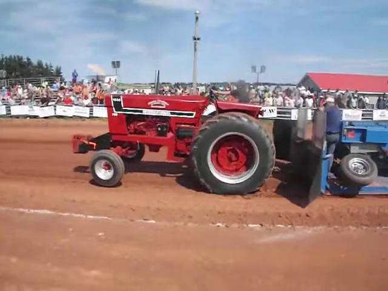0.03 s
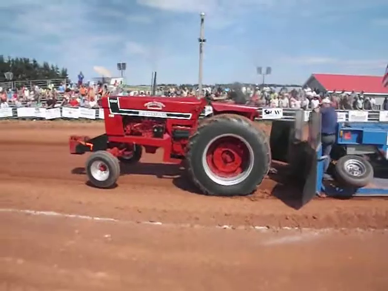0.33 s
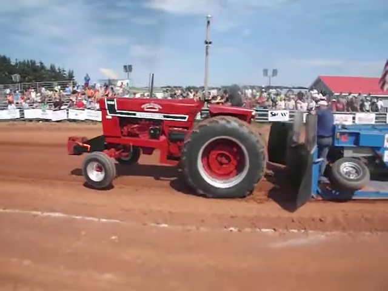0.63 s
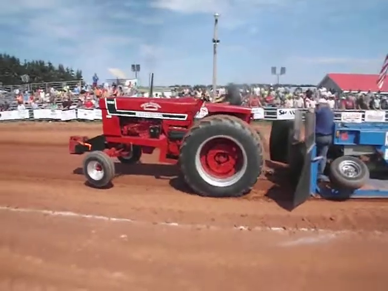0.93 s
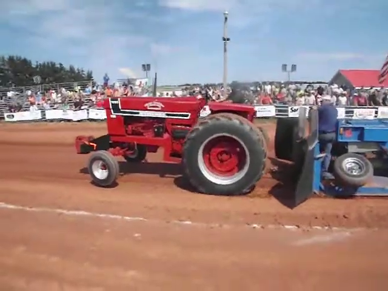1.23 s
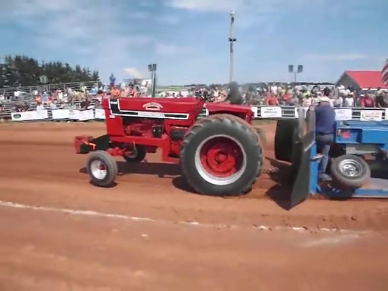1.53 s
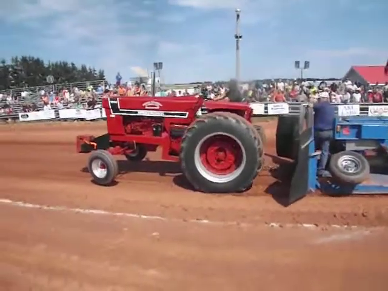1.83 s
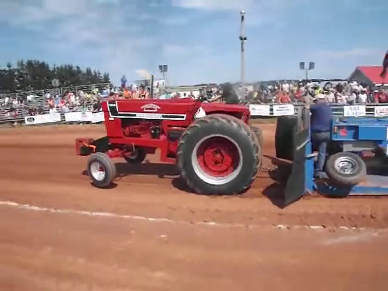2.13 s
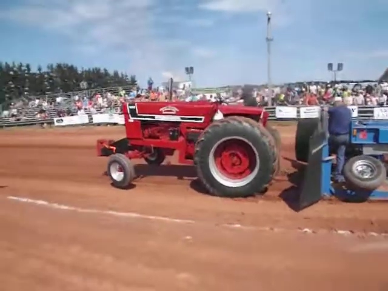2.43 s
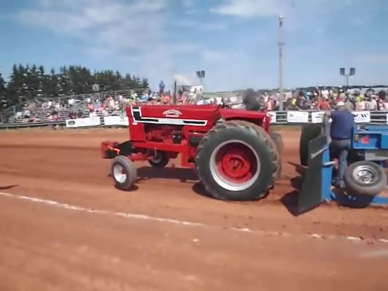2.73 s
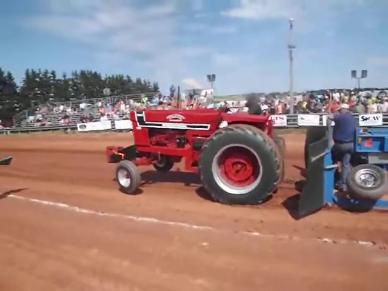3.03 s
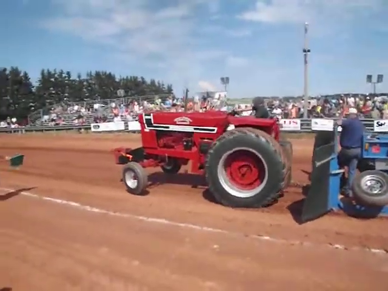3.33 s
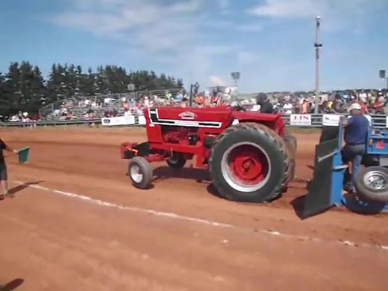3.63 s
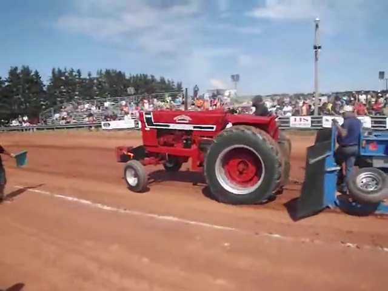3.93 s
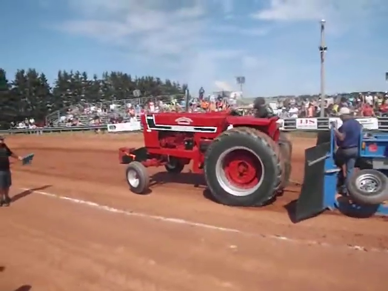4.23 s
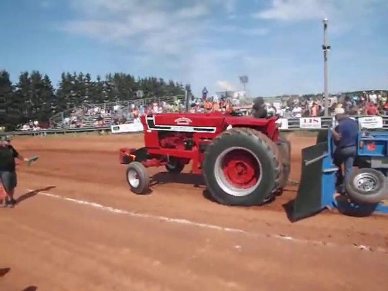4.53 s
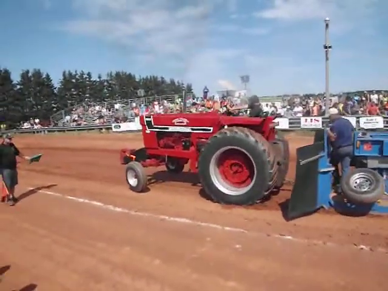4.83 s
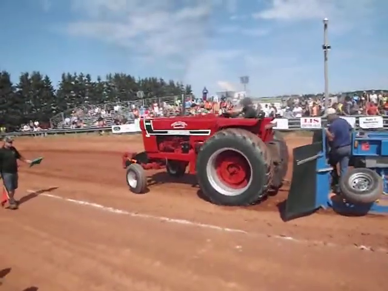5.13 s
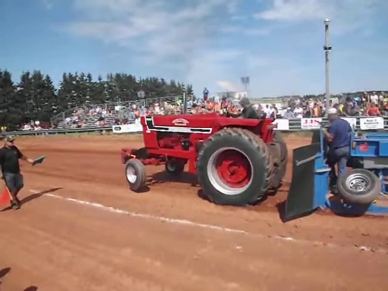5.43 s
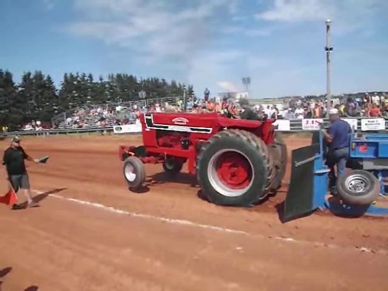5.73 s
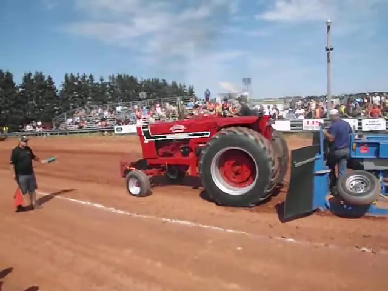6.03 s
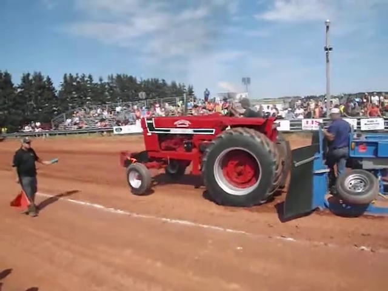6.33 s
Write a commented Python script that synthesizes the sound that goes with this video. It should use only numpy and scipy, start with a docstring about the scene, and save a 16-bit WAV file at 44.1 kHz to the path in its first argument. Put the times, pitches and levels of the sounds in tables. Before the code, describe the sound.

A diesel pulling tractor roars close by with a harsh metallic bark, lugs down under load, then revs up sharply.

```python
"""A six-cylinder diesel pulling tractor drags a sled down a dirt track, a few metres away.
It starts at a steady speed: each firing gives a harsh metallic bark and an exhaust thump, some crack
much harder, and the sled's engine drones underneath. A gear whine swells as the tractor passes.
At about 4.4 s the engine lugs down and the whine dies. From 5.6 s the load comes off and the engine
revs up; the bark dulls for a moment and a growl sings out of the exhaust pipe."""
import sys
import numpy as np
from scipy import signal
from scipy.fft import rfft, irfft
from scipy.io import wavfile
from scipy.ndimage import uniform_filter1d, minimum_filter1d

SR = 44100
rng = np.random.default_rng(int(sys.argv[2]) if len(sys.argv) > 2 else 0)


def unload_wav(signal):
    """Save mono or channel-first audio to the path in sys.argv[1] as 16-bit WAV at rate SR, clipped to [-1, 1]."""
    wavfile.write(
        sys.argv[1],
        SR,
        np.round(np.clip(np.atleast_2d(signal).T, -1, 1) * 32767).astype(np.int16),
    )


N = 290178
TIME = np.arange(N) / SR

# The sled engine's drone. Each row: pitch in Hz, level in dB.
SLED_PARTIALS = [(32.1, -38), (64, -42.5)]
# EQ of the track's rumble. Each row: frequency in Hz, gain in dB.
RUMBLE_EQ = [(10, -8), (25, -13), (42, 9.5), (60, -14), (120, -0.5), (200, -17.5), (500, -46)]
# Engine speed. Each row: time in seconds, firing rate in Hz.
FIRING_RATE = [(0.0, 92.42), (0.8, 92.96), (1.25, 92.2), (2.2, 91.43), (2.5, 91.94), (4.28, 91.69),
               (4.62, 85.48), (5.25, 83.16), (5.6, 85.15), (5.82, 114.62), (6.05, 137.37), (6.58, 174.02)]
# Engine load, which keeps the bark bright. Each row: time in seconds, load from 0 to 1.
ENGINE_LOAD = [(0, 0.75), (5.6, 0.89), (5.95, 0), (6.12, 0), (6.35, 0.4), (6.58, 1)]
# The cylinders in firing order. Each entry: relative strength in dB.
CYLINDER_DB = [0, 2.5, -2.5, -1, -2.5, 1.5]
# Brief loud swells, after which the level ducks and recovers. Each row: end in seconds,
# length in seconds, bark change in dB, roar change in dB, depth of the dip in dB.
LEVEL_SWELLS_AND_DIPS = [(0.531, 0.12, 2.5, 2.5, 3.5), (0.684, 0.081, 3, 3.5, 0.5),
                         (0.896, 0.037, 3.5, 1, 2), (1.85, 0.099, 1, 2, -1), (2.292, 0.06, 1, 0, 5.5),
                         (2.664, 0.19, 2, 1.5, 3.5), (3.502, 0.054, 2.5, 3.5, 3.0),
                         (3.706, 0.054, 1.5, 2.0, 1.5), (3.892, 0.088, 3, 2, 0.5), (4.467, 0.057, 1, 2, 1),
                         (4.83, 0.12, 1.0, 2, 4), (4.923, 0.047, 5.5, 6.5, 1.5),
                         (5.535, 0.084, 1, 4.5, 0.5), (5.745, 0.033, 4.5, 3, 2), (6.08, 0.044, 5, -8.5, 8)]
# The deep exhaust note. Each row: time in seconds, fundamental level in dB, octave level in dB.
EXHAUST_NOTE = [(0, -35, -29), (1.2, -32.5, -30), (2.8, -29.5, -36), (4.1, -30.5, -42.5), (4.5, -30.5, -34),
                (5.4, -26.5, -35), (6.0, -34, -30.5), (6.2, -27, -50)]
# Growl of unequal cylinders. Each entry: relative dB of one cycle-rate harmonic, from the 7th up.
GROWL_HARMONICS_DB = [-3.5, 6, 10, 6, 1, -14.5, 4, 4, 5, -4.5, 0.5, 6, -16, 0.5, 6, -7, 2, 0, -10, 0.5, 3.5,
                      -7.5, -5.5, -9, -5, 3, -11.5, -2.5]
# Resonances of the exhaust pipe. Each row: frequency in Hz, gain in dB.
PIPE_EQ = [(90, -21), (138, -20.5), (160, -5), (212, -6.5), (250, 0.5), (300, -9.5), (340, -3.5), (392, -1),
           (425, -9.5), (465, -15.5), (520, 0), (600, 3.5), (710, -3.5), (810, 2.5), (890, -11),
           (1020, -3.5), (1220, -24), (1390, -1.5), (1500, -11.5), (2500, -42)]
# Ping of the exhaust stack. Each row: pitch in Hz, decay time in seconds, relative level in dB.
STACK_MODES = [(2814, 0.0032, -5.5), (3073, 0.0029, 1.5), (3235, 0.0016, 5.5)]
# Rasp of the gas in stack and block. Each row: frequency in Hz, gain in dB.
RASP_EQ = [(500, -20.5), (900, -14), (1500, -11.5), (1870, -9.5), (2220, -5.5), (2430, -8), (2750, 1),
           (3350, 1), (3650, -9), (4020, -7), (4250, -8.5), (5100, -14.5), (5500, -31), (5900, -37.5)]
# Single hard firings. Each row: start in seconds, relative strength in dB.
HARD_HITS = [(0.0593, -7), (0.4279, -3), (0.7068, -5), (0.8495, -3), (1.0316, -5), (1.291, -4),
             (1.5189, -4), (1.8153, -5), (2.3376, -5), (2.4463, -6), (2.5336, -3), (2.5985, -3),
             (2.6648, -3), (2.9248, -5), (3.2535, -3), (3.4714, -5), (3.5359, -5), (3.8861, -2),
             (4.1679, -6), (4.4323, -3), (4.6394, -4), (4.8509, -8), (5.2076, -5), (5.2794, -3),
             (5.4944, -3)]


def undb(db):
    """Decibels to gain."""
    return 10 ** (np.asarray(db) / 20)


def unit(x):
    """Scale to rms 1."""
    return x / np.sqrt(np.mean(x ** 2))


def steady(x):
    """Ride the level to rms 1 over about two engine cycles, keeping single firings distinct."""
    return x / np.sqrt(uniform_filter1d(x ** 2, size=5700) + 1e-12)


def curves(table):
    """One automation curve per value column of (seconds, value, ..) rows."""
    times, *columns = np.transpose(table)
    return [np.interp(TIME, times, column) for column in columns]


def wander(rate_hz):
    """Smooth random drift with rms 1."""
    span = int(SR / rate_hz)
    drift = uniform_filter1d(rng.standard_normal(N), span, mode="wrap")
    return unit(uniform_filter1d(drift, span, mode="wrap"))


def equalize(x, eq):
    """Minimum-phase EQ through (Hz, dB) points."""
    hz, db = np.transpose(eq)
    size = 2 ** 13
    bin_hz = np.arange(size // 2 + 1) * SR / size
    gain = undb(np.interp(np.log(bin_hz + 1), np.log(hz), db))
    cepstrum = irfft(np.log(gain))[:size // 2]
    cepstrum[1:] *= 2
    impulse = irfft(np.exp(rfft(cepstrum, size)))
    return signal.fftconvolve(x, impulse)[:N]


def noise(eq, envelope=1):
    """White noise shaped by an envelope, then an EQ."""
    return equalize(rng.standard_normal(N) * envelope, eq)


def muffle(x, edge_hz):
    """Roll off the treble above the edge."""
    return signal.sosfiltfilt(signal.butter(3, edge_hz, fs=SR, output="sos"), x)


def band(x, hz, width_hz):
    """Isolate one resonant band."""
    return signal.lfilter(*signal.iirpeak(hz, hz / width_hz, fs=SR), x)


def bursts(impulses, rise_s, fall_s):
    """Give each impulse an attack and a decay."""
    t = np.arange(SR // 20) / SR
    shape = (1 - np.exp(-t / rise_s)) * np.exp(-t / fall_s)
    return np.abs(signal.fftconvolve(impulses, shape / shape.max())[:N])


def level_rides():
    """Fluttering fader moves in dB for bark and roar: the level swells, holds, dips and recovers."""
    rise_s, drop_s, recovery_db_per_s = 0.022, 0.049, 31.5
    rides = np.zeros((2, N))
    for end, length, bark_db, roar_db, dip_db in LEVEL_SWELLS_AND_DIPS:
        start, bottom = end - length, end + drop_s / 2
        recovered = bottom + abs(dip_db) / recovery_db_per_s
        times = np.sort([start - rise_s, start, end - drop_s / 2, bottom, recovered])
        rides += [np.interp(TIME, times, [0, db, db, -dip_db, 0]) for db in (bark_db, roar_db)]
    return rides + wander(9.8)


def sled():
    """The bed: the sled engine's low drone over the rumble of its pan dragged through the dirt."""
    drone = 0
    for hz, db in SLED_PARTIALS:
        level = np.sqrt(2) * undb(db + 1.8 * wander(5.8))
        drone += level * np.sin(2 * np.pi * hz * TIME + 0.27 * wander(4))
    return drone + undb(-39) * unit(noise(RUMBLE_EQ))


def gear_whine(firing_count):
    """Teeth mesh on the crank: loudest as the tractor passes, dying once the engine lugs."""
    teeth, pass_s, lug_s = 22, 2.74, 4.44
    mesh_db = -30.5 - 2.33 * np.abs(TIME - pass_s) - 110.5 * np.maximum(TIME - lug_s, 0)
    octave_db = mesh_db - 9.5 + 7.5 * np.exp(-((TIME - 1.5) / 0.46) ** 2)  # rings out around 1.5 s
    mesh_phase = 2 * np.pi * teeth * firing_count / 3 + 0.35 * wander(9)  # three firings a crank turn
    cycle_phase = 2 * np.pi * firing_count / len(CYLINDER_DB)
    sway = undb(-8.5) * np.sin(mesh_phase + cycle_phase)  # beats with the engine cycle
    whine = undb(mesh_db) * (np.sin(mesh_phase) + sway) + undb(octave_db) * np.sin(2 * mesh_phase)
    return np.sqrt(2) * whine * undb(0.99 * wander(16))


def firings(firing_count, scatter_db, jitter_s):
    """One impulse per firing; each cylinder has its own strength and no two firings are alike."""
    starts = np.flatnonzero(np.diff(np.floor(firing_count)) > 0)
    level_spread, time_spread = rng.standard_normal((len(starts), 2)).T
    strength = undb(np.resize(CYLINDER_DB, len(starts)) + scatter_db * level_spread)
    jittered = np.clip(starts + jitter_s * SR * time_spread, 0, N - 1).astype(int)
    return np.bincount(jittered, strength, N)


def exhaust_note(firing_count):
    """The low end: a deep note at the firing rate and its octave."""
    return sum(np.sqrt(2) * undb(db + wander(58)) * np.sin(2 * np.pi * harmonic * firing_count)
               for harmonic, db in enumerate(curves(EXHAUST_NOTE), 1))


def exhaust_roar(firing_count, firing_hz):
    """The body: a growl repeating every two crank turns in the pipe, and a turbulent puff per firing."""
    cycles = firing_count / len(CYLINDER_DB)
    growl = sum(undb(db + 1.5 * wander(6)) * np.sin(2 * np.pi * (harmonic * cycles + rng.random()))
                for harmonic, db in enumerate(GROWL_HARMONICS_DB, len(CYLINDER_DB) + 1))
    pulses = firings(firing_count - 0.3, scatter_db=1.5, jitter_s=0.00023)
    puffs = unit(noise(PIPE_EQ, bursts(pulses, rise_s=0.00055, fall_s=0.0064)))
    racing_db = 0.27 * np.maximum(firing_hz - 155, 0)  # the growl sings out at high revs
    pipe = undb(racing_db) * unit(equalize(growl, PIPE_EQ)) + undb(0.5 + 0.3 * racing_db) * puffs
    boom_db = 0.5 - 6 * np.maximum(3.2 - TIME, 0)  # builds until 3.2 s, then holds
    return unit(pipe + undb(boom_db) * band(pipe, hz=388, width_hz=50))


def ground_bounce(x):
    """The track reflects the bark a little later; the comb shifts as the tractor moves away."""
    lag_s = 0.00417 * (1 - 0.026 * TIME)
    return x + 0.23 * np.interp(TIME - lag_s, TIME, x)


def thin_with_distance(x):
    """The lower side of the bark's peak weakens as the tractor draws away."""
    band_db = -0.48 * (TIME - 2.5)
    return x + (undb(band_db) - 1) * band(x, hz=2700, width_hz=380)


def stack_ping(strikes):
    """The stack's close modes build up over a millisecond, beat and die away."""
    t = np.arange(SR // 40) / SR
    ring = sum(undb(db) * np.exp(-t / decay_s) * np.sin(2 * np.pi * hz * t)
               for hz, decay_s, db in STACK_MODES)
    ring *= 1 - np.exp(-t / 0.0021)
    return signal.fftconvolve(strikes, ring / np.abs(ring).max())[:N]


def cracks():
    """The accents: now and then one firing hits the stack much harder than the rest."""
    start_s, db = np.transpose(HARD_HITS)
    hits = np.bincount((start_s * SR).astype(int), undb(db), N)
    rasp = bursts(hits, rise_s=0.001, fall_s=0.002) * unit(noise(RASP_EQ))
    return undb(-1) * stack_ping(hits) + undb(-9.5) * rasp


def bark(firing_count):
    """The lead: each firing releases a rasping burst of gas and pings the stack, over a steady rush."""
    pulses = firings(firing_count - 0.57, scatter_db=2.5, jitter_s=0.00022)
    gas_flow = unit(bursts(pulses, rise_s=0.0018, fall_s=0.0035)) + 0.5
    rasp = steady(noise(RASP_EQ, gas_flow))
    rush = unit(muffle(noise(RASP_EQ), edge_hz=3290))
    strikes = firings(firing_count - 0.65, scatter_db=3, jitter_s=0.00058)
    bright = rasp + undb(-8) * (steady(stack_ping(strikes)) + rush)
    load = curves(ENGINE_LOAD)[0]
    return unit(load * bright + (1 - load) * muffle(bright, edge_hz=4940))


def scene():
    """The mix: one crank drives bark, exhaust and gear; note, whine and sled swell and dip with the roar."""
    firing_hz = curves(FIRING_RATE)[0]
    firing_count = np.cumsum(firing_hz) / SR
    bark_ride_db, roar_ride_db = level_rides()
    # The ordinary bark ducks under each hard firing and fades slightly with distance.
    duck_db = sum(-2.5 * np.exp(-((TIME - start_s) / 0.0024) ** 2) for start_s, _ in HARD_HITS)
    bark_db = -19 - 0.0054 * TIME + bark_ride_db + duck_db
    metal = undb(bark_db) * bark(firing_count) + cracks()
    lead = thin_with_distance(ground_bounce(metal))
    roar = undb(-26.5 + roar_ride_db) * exhaust_roar(firing_count, firing_hz)
    note = undb(0.88 * roar_ride_db) * exhaust_note(firing_count)
    backing = undb(0.59 * roar_ride_db) * (gear_whine(firing_count) + sled())
    return (lead + roar + note + backing)[None]


def record(dry):
    """A narrow-band microphone chain: a limiter holds the peaks, whose tips clip with a faint crackle."""
    band_hz, top_hz = 6000, 15800
    limit, clip_level, window = 0.77, 0.72, 131  # window in samples
    narrow = signal.sosfilt(signal.ellip(8, 0.2, 70, band_hz, fs=SR, output="sos"), dry)
    needed_gain = limit / np.maximum(np.abs(narrow), limit)
    gain = uniform_filter1d(minimum_filter1d(needed_gain, window), window)
    clipped = np.clip(narrow * gain, -clip_level, clip_level)
    return signal.sosfilt(signal.ellip(8, 0.2, 70, top_hz, fs=SR, output="sos"), clipped)


dry = scene()
out = record(dry)
unload_wav(out)
```